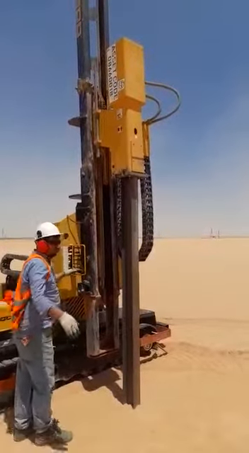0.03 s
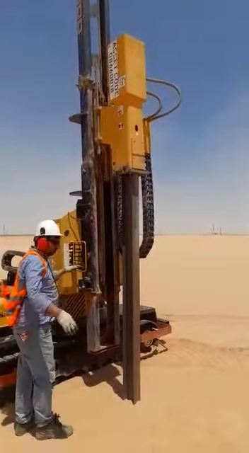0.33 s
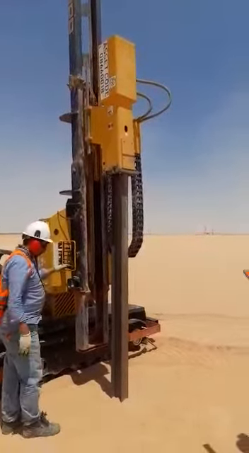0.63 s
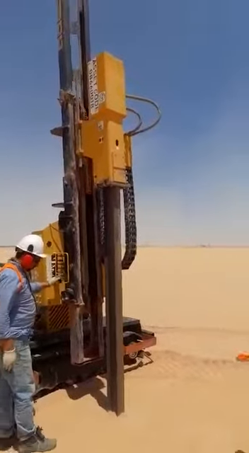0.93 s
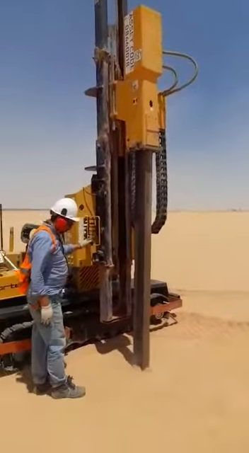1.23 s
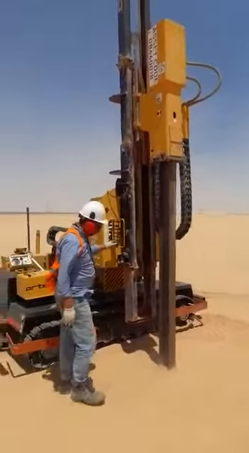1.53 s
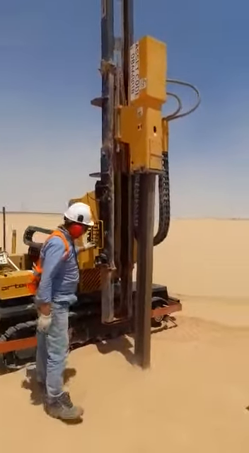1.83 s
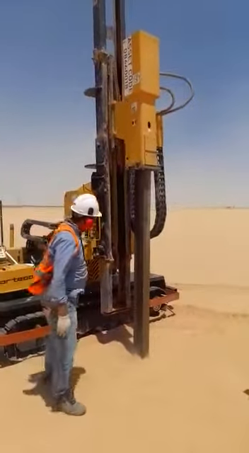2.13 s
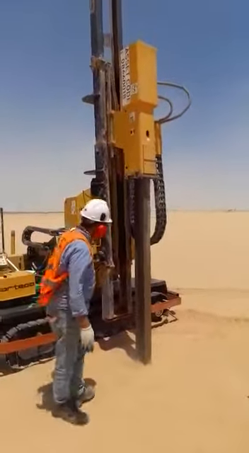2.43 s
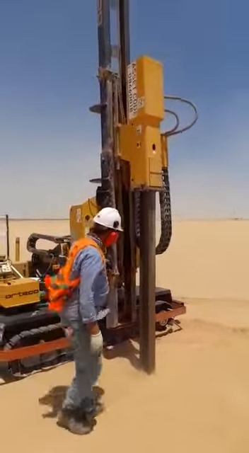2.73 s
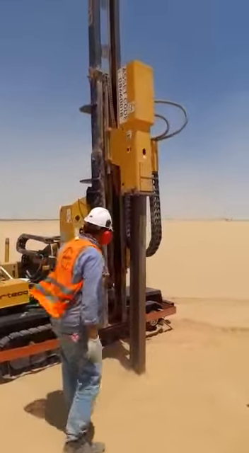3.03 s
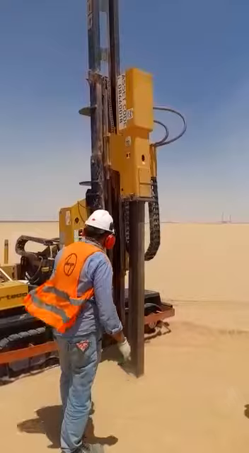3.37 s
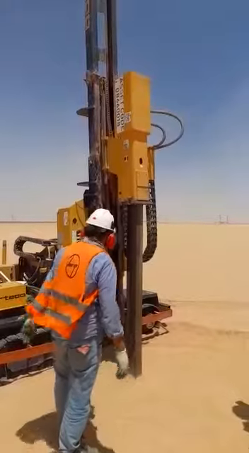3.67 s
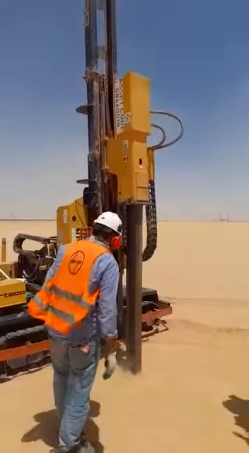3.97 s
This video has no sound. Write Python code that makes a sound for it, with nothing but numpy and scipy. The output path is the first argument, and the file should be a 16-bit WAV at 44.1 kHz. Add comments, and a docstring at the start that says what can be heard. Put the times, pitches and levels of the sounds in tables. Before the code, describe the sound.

A hydraulic hammer drives a steel post into sand with loud, rapid clangs that speed up and leave the post ringing. Before it starts, an engine idles with a faint pump whine and wind buffets the microphone outdoors.

```python
"""First you hear an idling engine, a whining pump and wind on the microphone, with two short, dull puffs.
Then a hydraulic hammer drives a steel post into desert sand, speeding up to about fifteen blows a second.
Each blow is a clatter whose clang sweeps down in pitch as it dies, leaving the post ringing.
A fast gain control turns everything down on the loud blows."""
import sys
import numpy as np
from scipy import signal
from scipy.fft import rfft, irfft
from scipy.io import wavfile

SR = 44100
rng = np.random.default_rng(int(sys.argv[2]) if len(sys.argv) > 2 else 0)


def log_audio(samples):
    """Write samples as a 16-bit WAV file to the path given in sys.argv[1]."""
    # one column per channel
    frames = np.atleast_2d(samples).T
    # limit to full scale, then quantise
    limited = np.clip(frames, -1, 1)
    pcm = np.round(limited * 32767).astype(np.int16)
    wavfile.write(sys.argv[1], SR, pcm)


N = 176400

BLOW_S, ATTACK_S, SCATTER_DB = .2, .0014, 2  # shared by the clang and the ringing
PITCH_WOBBLE = .002  # fraction of the pitch, for engine and pump

# hammer blows: t/s, thud level/dB, treble level/dB, lowest ringing note's level/dB, clatter length/s
BLOWS = [(1.1522, -6, 0.5, 8, 0.059), (1.264, 3, 5.5, -0.5, 0.045), (1.3634, -0.5, 2.5, -3.0, 0.041),
         (1.449, -3, 1, 2.5, 0.035), (1.527, -4, 2, -9, 0.034), (1.603, -4, 0.5, -14, 0.034),
         (1.672, -3.5, -0.0, -0.5, 0.031), (1.741, -5, -1.5, -2, 0.051), (1.8095, -3.5, 3.5, -15, 0.021),
         (1.8735, -3.5, -1, 2, 0.021), (1.932, -3.5, 3, 8.5, 0.029), (2.0035, -4, 1, -4, 0.016),
         (2.065, -3.5, 1.5, -32, 0.021), (2.131, 0.5, 3, 11.5, 0.033), (2.1903, -4.5, 4.5, 8, 0.02),
         (2.2544, -6, 1, 0.5, 0.016), (2.3217, 1.5, 6, 3, 0.019), (2.381, -4, 2, 2, 0.023),
         (2.4545, -3, -2.5, 3.5, 0.027), (2.511, -2.5, 2.5, 1.5, 0.031), (2.5825, -5.5, 0.5, -17, 0.03),
         (2.6448, -5, 2.5, 4, 0.022), (2.7092, -1.5, 0.5, 0, 0.019), (2.7716, -1.5, -1, -1, 0.028),
         (2.841, -1, 2.5, -2, 0.013), (2.901, -2.5, 3.5, 2.5, 0.0093), (2.97, -2, 3.5, -5, 0.016),
         (3.0315, -4, 0.5, 0.5, 0.02), (3.098, -2.5, 0, -2, 0.031), (3.16, 2.5, 6, -0.5, 0.025),
         (3.227, -9.5, 4, -5.5, 0.0043), (3.292, -1, 0.5, 8.5, 0.021), (3.3524, -3.5, -1.5, 1.5, 0.022),
         (3.424, -0.5, -1.5, 2.5, 0.023), (3.486, -18.5, -4, -6.5, 0.0079), (3.5546, -5, -2.5, 6.5, 0.0058),
         (3.62, 5, 2.5, 13.5, 0.013), (3.681, 2, -1, 3.5, 0.027), (3.753, -2, 1, 3.5, 0.0017),
         (3.8137, -15, -8.5, 6.5, 0.019), (3.8843, -15.5, -5, -2, 0.014), (3.951, -16.5, -4.5, 6.5, 0.0054)]
# tone colour of the steel's clang: f/Hz, relative level/dB
CLANG_SPECTRUM = [(60, -27), (200, -19.5), (450, -11.5), (800, -10.5), (1200, 4.5), (2300, 6), (3500, -7.5),
                  (5000, -12), (6800, -13), (8000, -49), (10500, -13), (14000, -34), (16500, -16)]
# how long slow bending waves outlast the clatter: f/Hz, extra time/s
LINGER = [(200, 0.03), (800, 0.034), (1400, 0.027), (2300, 0.021), (4000, 0.0026)]
# fading while the clang holds (negative swells): f/Hz, fade/(dB per s)
HOLD_FADE = [(200, -58), (900, 0), (1500, 105), (2500, 210), (5000, 163)]
def clang():
    """Each blow cracks, holds while the hammer clatters, then dies. Low waves come late: the pitch falls."""
    thud_below_hz, treble_above_hz, ripple_spacing_hz = 1300, 2270, 75
    flicker_db, flicker_hz, release_db_per_s = 2.2, 85, 406
    crack_db, crack_s, swell_db, swell_s = 3.5, .009, 9, .006
    out, t = np.zeros((2, N)), np.arange(int(BLOW_S * SR)) / SR
    clatter, attack = drift(flicker_hz), 1 - np.exp(-t / ATTACK_S)
    for hz, noise in bands(CLANG_SPECTRUM):
        flicker = from_db(flicker_db * (clatter + drift(flicker_hz)) / np.sqrt(2))
        thud = 1 / (1 + (hz / thud_below_hz) ** 6)
        treble = 1 / (1 + (treble_above_hz / hz) ** 6)
        linger_s, fade_db_per_s = at_hz(LINGER, hz), at_hz(HOLD_FADE, hz)
        shared = .3 * treble  # part of the treble is alike in every blow
        crack = crack_db * (hz > 2 * treble_above_hz) * np.exp(-t / crack_s)
        noise = steel_resonances(noise, depth_db=2.5 * treble, spacing_hz=ripple_spacing_hz)
        band, offsets = np.zeros((2, N)), rng.integers(0, N - len(t), len(BLOWS))
        for (start_s, thud_db, treble_db, _, clatter_s), i in zip(BLOWS, offsets):
            held_s = np.minimum(t, clatter_s + linger_s)
            fade_db = fade_db_per_s * held_s + release_db_per_s * (t - held_s)
            arrival_s = clatter_s + linger_s + .004 * rng.normal()
            swell = np.exp(-.5 * ((t - arrival_s) / swell_s) ** 2) - .5
            sweep_db = (swell_db + 2 * SCATTER_DB * rng.normal()) * (1 - treble) * swell
            db = thud * thud_db + treble * treble_db + crack + sweep_db - fade_db
            waves = np.sqrt(shared) * noise[:, -len(t):] + np.sqrt(1 - shared) * noise[:, i:i + len(t)]
            if hz > thud_below_hz:  # each blow favours other high resonances
                waves = steel_resonances(waves, depth_db=6 * treble, spacing_hz=2 * ripple_spacing_hz)
            add(band, start_s, attack * from_db(db) * waves)
        out += band * flicker
    return from_db(10) * out


def steel_resonances(noise, depth_db, spacing_hz):
    """Steel has many close resonances, so some pitches come out louder and others softer."""
    size = noise.shape[1]
    hz = np.arange(size // 2 + 1) * SR / size
    grid_hz = np.arange(0, SR / 2, spacing_hz)
    ripple_db = depth_db * np.clip(rng.normal(size=len(grid_hz)), -2, 2)
    ripple = from_db(np.interp(hz, grid_hz, ripple_db))
    return rms_one(irfft(rfft(noise) * ripple, size)) * np.std(noise)


# the notes the post rings at: f/Hz, relative level/dB
POST_NOTES = [(1959, 2.5), (2966, -18), (3578, -25), (4378, -27), (5394, -28), (5884, -23), (6881, -29),
              (8626, -37)]
def post_ring():
    """The struck post rings: high notes at once, the lowest building up. The next blow chokes them."""
    ring_s, choke_s, detune = .19, .00043, .00155  # ring_s: time to fall by 60 dB
    out, t = np.zeros((2, N)), np.arange(int(BLOW_S * SR)) / SR
    gaps_s = np.diff([blow[0] for blow in BLOWS] + [N / SR + BLOW_S])
    lowest_hz = POST_NOTES[0][0]
    for hz, note_db in POST_NOTES:
        for (start_s, _, treble_db, lowest_db, clatter_s), gap_s in zip(BLOWS, gaps_s):
            peak_s = clatter_s + at_hz(LINGER, hz)
            if hz == lowest_hz:
                rise, blow_db = np.minimum(t / peak_s, 1) ** 2, lowest_db
            else:
                rise, blow_db = 1 - np.exp(-t / ATTACK_S), treble_db + 2 * SCATTER_DB * rng.normal()
            fade = from_db(-60 * np.maximum(t - peak_s, 0) / ring_s)
            choke = np.exp(-np.maximum(t - gap_s, 0) / choke_s)
            db = note_db + blow_db + SCATTER_DB * rng.normal(size=(2, 1))
            pitch_hz = hz + lowest_hz * detune * rng.normal()
            cycles = pitch_hz * t + rng.random() + .5 * rng.random((2, 1))
            add(out, start_s, from_db(db) * rise * fade * choke * np.sin(2 * np.pi * cycles))
    return out


# tone colour of engine and fan noise: f/Hz, relative level/dB
ENGINE_SPECTRUM = [(30, -52), (80, 4.5), (200, -11.5), (1200, -11), (2200, -14), (3200, -25.5),
                   (5500, -29.5), (7200, -38.5), (8200, -51), (11500, -40), (16000, -45)]
# engine tones, the firing rate first: f/Hz, level/dB
ENGINE_TONES = [(65, -38), (1023, -44)]
def engine():
    """A roar that pulses each time the engine fires, with slightly wavering tones."""
    t, firing_hz = np.arange(N) / SR, ENGINE_TONES[0][0]
    pulse_db = np.sin(2 * np.pi * firing_hz * t) + drift(75)
    roar = from_db(-29.5 + pulse_db) * sum(noise for _, noise in bands(ENGINE_SPECTRUM))
    tones = 0
    for hz, db in ENGINE_TONES:
        cycles = np.cumsum(hz * (1 + PITCH_WOBBLE * drift(20))) / SR + .3 * rng.random((2, 1))
        tones += np.sqrt(2) * from_db(db + 2 * drift(26)) * np.sin(2 * np.pi * cycles)
    return roar + tones


# the pump's whine, idling and then working: f/Hz, level/dB
PUMP_WHINE = [(5211, -56), (6019, -62)]
def pump(valve_opens_s=.89):
    """The whine jumps higher and turns softer when the valve opens to the hammer."""
    working = np.arange(N) / SR > valve_opens_s
    hz, db = np.array(PUMP_WHINE)[working.astype(int)].T
    cycles = np.cumsum(hz * (1 + PITCH_WOBBLE * drift(17.6))) / SR + rng.random((2, 1)) / 2
    return np.sqrt(2) * from_db(db + 2 * drift(16)) * np.sin(2 * np.pi * cycles)


# when the puffs of wind hit: t/s
PUFF_TIMES = [0.062, 0.11]
def wind_puffs(decay_s=.006):
    """Two short, dull puffs of wind hit the microphone."""
    t = np.arange(N) / SR
    puffs = sum((t > start_s) * np.exp(-np.abs(t - start_s) / decay_s) for start_s in PUFF_TIMES)
    return from_db(-21) * puffs * band_noise(500, 1800)


# tone colour of the wind: f/Hz, relative level/dB
WIND_SPECTRUM = [(25, -34), (65, -20), (130, -2.5), (300, -11.5), (1500, -25)]
# gusts: t/s, level/dB, half length/s, top f/Hz
GUSTS = [(0.012, -25, 0.027, 550), (0.265, -26.5, 0.13, 130), (0.64, -22.5, 0.0084, 315),
         (0.769, -24.5, 0.03, 103), (0.903, -27, 0.091, 660), (0.934, -14.5, 0.0035, 930),
         (1.011, -24, 0.0044, 400), (1.083, -21.5, 0.019, 890), (1.358, -9.5, 0.018, 367)]
def wind(rumble_db=-33, swing_db=5):
    """Air buffets the microphone: a lumpy rumble with short gusts on top."""
    t, cutoff_hz = np.arange(N) / SR, WIND_SPECTRUM[-1][0]
    out = from_db(rumble_db + swing_db * drift(18)) * sum(noise for _, noise in bands(WIND_SPECTRUM))
    for peak_s, db, half_s, top_hz in GUSTS:
        out += from_db(db) * np.exp(-.5 * ((t - peak_s) / half_s) ** 2) * band_noise(49, top_hz)
    return signal.sosfilt(signal.butter(2, cutoff_hz, fs=SR, output="sos"), out)


def from_db(db):
    """Turn decibels into a volume factor."""
    return 10 ** (np.asarray(db) / 20)


def rms_one(x):
    """Scale a signal to an average strength (rms) of 1."""
    return x / np.sqrt(np.mean(x ** 2) + 1e-20)


def at_hz(table, hz):
    """Read between a table's rows, giving each octave equal room."""
    table_hz, values = np.array(table).T
    return np.interp(np.log(hz), np.log(table_hz), values)


def drift(rate_hz):
    """A smooth random wander, about 1 in size."""
    step, warm_up = 40, 2000
    pole = np.exp(-2 * np.pi * step * rate_hz / SR)
    noise = rng.standard_normal(N // step + warm_up + 2)
    slow = signal.lfilter([1], [1, -2 * pole, pole * pole], noise)[warm_up:]
    return np.interp(np.arange(N) / step, np.arange(len(slow)), rms_one(slow))


def smooth(x, seconds):
    """A running average that gradually forgets the past."""
    pole = np.exp(-1 / (seconds * SR))
    return signal.lfilter([1 - pole], [1, -pole], x)


def band_noise(low_hz, high_hz, likeness=.019):
    """Noise between two frequencies; left and right are barely alike."""
    bandpass = signal.butter(2, [low_hz, high_hz], "band", fs=SR, output="sos")
    mid, side = signal.sosfilt(bandpass, rng.standard_normal((2, N)))
    return rms_one(np.sqrt(1 + likeness) * mid + np.sqrt(1 - likeness) * side * [[1], [-1]])


def bands(spectrum):
    """Give (centre frequency, noise) for each band; together they have this tone colour."""
    edges_hz = np.geomspace(25, 17000, 27)
    centres_hz = np.sqrt(edges_hz[1:] * edges_hz[:-1])
    gains = from_db(at_hz(spectrum, centres_hz)) * np.sqrt(np.diff(edges_hz))
    for hz, gain, low, high in zip(centres_hz, gains / np.linalg.norm(gains), edges_hz, edges_hz[1:]):
        yield hz, gain * band_noise(low, high)


def add(out, start_s, sound):
    """Mix a sound in at the given time."""
    i = int(start_s * SR)
    out[:, i:i + sound.shape[1]] += sound[:, :N - i]


def scene():
    """Hammer and post, with the machine and the wind behind them."""
    return clang() + post_ring() + engine() + pump() + wind_puffs() + wind()


def record(dry):
    """A fast gain control ducks loud blows, then recovers; peaks are rounded, the highest treble is cut."""
    limit_db, boost_db, recovery_db_per_s = -12.5, 2.5, 142
    detect_s, grab_s, cutoff_hz = .0037, .0052, 16750
    t = np.arange(N) / SR
    level_db = 10 * np.log10(smooth(np.mean(dry ** 2, axis=0), detect_s) + 1e-12)
    excess_db, recovery_db = np.maximum(level_db - limit_db, 0), recovery_db_per_s * t
    duck_db = np.maximum.accumulate(excess_db + recovery_db) - recovery_db
    early_duck_db = np.interp(t + 2 * grab_s, t, smooth(duck_db, grab_s))  # looks a little ahead
    rounded = np.tanh(dry * from_db(boost_db - early_duck_db))
    return signal.sosfilt(signal.cheby2(20, 70, cutoff_hz, fs=SR, output="sos"), rounded)


dry = scene()
out = record(dry)
log_audio(out)
```